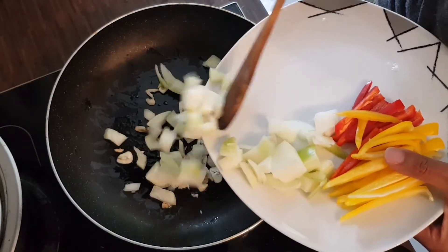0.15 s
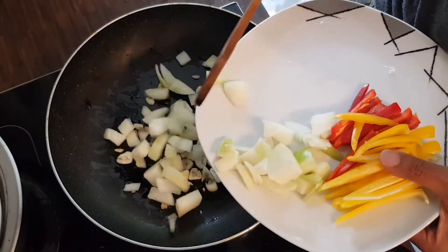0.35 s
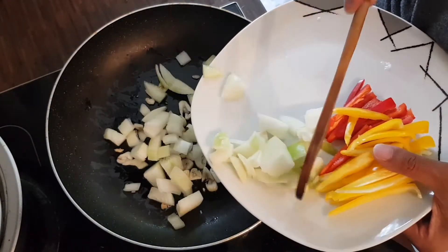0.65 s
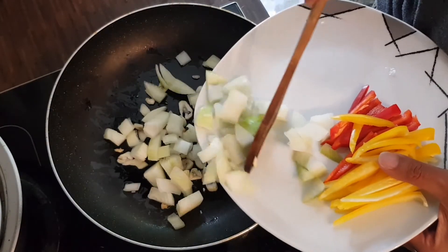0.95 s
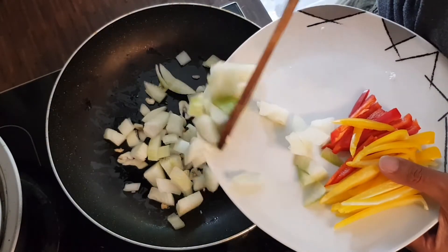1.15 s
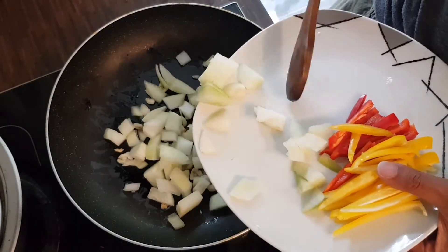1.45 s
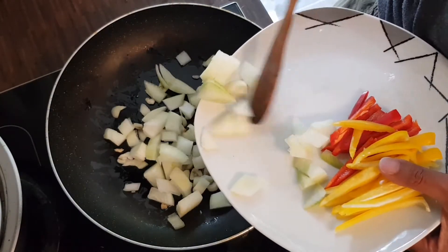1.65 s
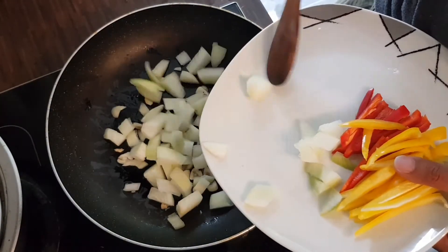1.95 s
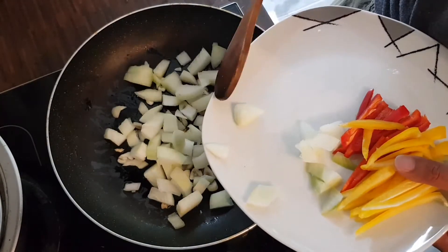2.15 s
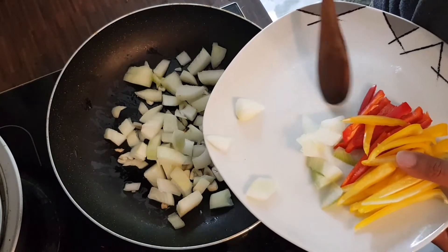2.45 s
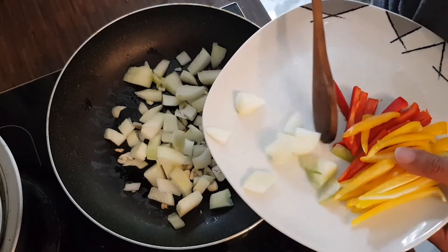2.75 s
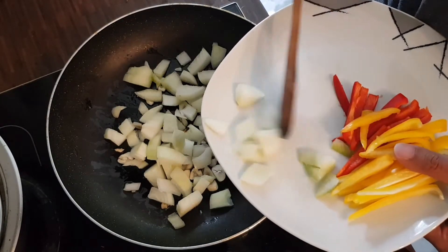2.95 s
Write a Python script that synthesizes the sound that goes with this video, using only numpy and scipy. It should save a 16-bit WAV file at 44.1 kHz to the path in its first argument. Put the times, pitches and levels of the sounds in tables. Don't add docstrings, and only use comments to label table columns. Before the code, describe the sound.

Wooden spatula knocks on a ceramic plate at about 0.7, 1.5, 2.0 and 2.3 s: ringing, full and bright, drier, then dull. Oil sizzles throughout, slightly left, swelling by 0.4 s, with sharp spits and snaps densest around 2.0-2.3 s. Soft onion heaps rub and thud into the pan near 0.2, 1.2 and 1.9 s; coarser splashes follow from 2.15 to 2.65 s. Low extractor rumble, small kitchen, close stereo microphone.

```python
import sys
import numpy as np
from scipy import signal
from scipy.fft import rfft, irfft, next_fast_len
from scipy.io import wavfile
from scipy.ndimage import uniform_filter1d, map_coordinates

SR = 44100
rng = np.random.default_rng(int(sys.argv[2]) if len(sys.argv) > 2 else 0)


def bounce(signal):
    frames = np.transpose(np.atleast_2d(signal))
    limited = np.clip(frames, -1, 1)
    pcm = np.round(limited * 32767).astype(np.int16)
    wavfile.write(sys.argv[1], SR, pcm)


def boost_factor(decibels):
    exponent = np.asarray(decibels, float) / 20
    return 10 ** exponent


N = 136710

OIL_PAN = np.array([[10 ** (1.4 / 20)], [10 ** (-1.4 / 20)]])


def unit(x):
    return x / np.sqrt(np.mean(x ** 2) + 1e-20)


def along(points, hz):
    f, v = np.transpose(points)
    return np.interp(np.log(hz + 1), np.log(f + 1), v)


def wobble(rate_hz):
    knots = rng.standard_normal(int(N * rate_hz / SR) + 4)
    return map_coordinates(knots, [np.arange(N) * rate_hz / SR])


def filtered(x, response):
    size = next_fast_len(x.shape[-1] + 8192)
    spectrum = rfft(x, size) * response(np.fft.rfftfreq(size, 1 / SR))
    return irfft(spectrum, size)[..., :x.shape[-1]]


def octave_band(hz, octaves):
    return lambda f: np.exp(-.5 * (np.log2((f + 1) / hz) / octaves) ** 2)


def paired(pair, spectrum, alike):
    def mid_side(hz):
        turn = np.arccos(np.clip(along(alike, hz), -1, 1)) / 2
        return boost_factor(along(spectrum, hz)) * [np.cos(turn), np.sin(turn)]
    mid, side = filtered(pair, mid_side)
    return unit(np.array([mid + side, mid - side]))


def port_lead(points):
    return lambda f: np.exp(.5j * along(points, f) * np.array([[1], [-1]]))


def patchy(depth_db):
    z = signal.stft(rng.standard_normal((2, N)), nperseg=256)[2]
    field = uniform_filter1d(rng.standard_normal(z.shape[1:]), 12, 0)
    field = unit(uniform_filter1d(field, 8, 1))
    return signal.istft(z * boost_factor(depth_db * field), nperseg=256)[1][:, :N]


def ring(modes, t, attack_s, scatter_db, grip_db=0):
    late = np.clip(t / .015 - 1, 0, 1) * (grip_db > 0)

    def shake(steps):
        return late * np.interp(t * 100, np.arange(101), steps)

    out = 0
    for hz, db, t60_s in modes:
        level_db = db + scatter_db * rng.normal() + grip_db * shake(rng.standard_normal(101))
        stray_rad = 1.7 * shake(np.cumsum(rng.standard_normal(101)))
        out = out + boost_factor(level_db - 60 * t / t60_s) * np.sin(2 * np.pi * hz * t + stray_rad)
    return out * (1 - np.exp(-t / attack_s))


def add(track, s, x):
    start = round(s * SR)
    track[..., start:start + x.shape[-1]] += x


def crackle(hz):
    spread_db, cap_db, t60_s = 0.5, 14, .005
    pops = rng.random((1300, 2))
    pop_db = np.minimum(-spread_db * np.log(pops[:, 1]), cap_db)
    puffs = np.bincount((pops[:, 0] * N).astype(int), boost_factor(pop_db), N)
    puffs = signal.fftconvolve(puffs, boost_factor(-60 * np.arange(600) / SR / t60_s))[:N]
    size_gain = np.sqrt(9000 / hz) ** .3
    return filtered(puffs * rng.standard_normal((2, N)),
                    lambda f: np.exp(-np.log2((f + 1) / hz) ** 2 / .6) * size_gain)


def sizzle():
    # start_s, level_db, wetness_db
    boil = [(0, -47, -5), (.17, -45.5, 3.5), (.38, -41, -1), (.9, -44, -0.5), (1.3, -40.5, -0.5),
            (1.8, -41.5, -1), (2.18, -40, 1.5), (3.1, -40, -2)]
    # freq_hz, level_db (per Hz)
    fizz_spectrum = [(500, -56), (1200, -5), (1950, -11.5), (2600, -6), (4500, -2.5), (8000, -2),
                     (11500, 0.5), (15800, -1)]
    # freq_hz, likeness (0..1)
    fizz_alike = [(1000, 0.057), (3000, 0.022), (8000, 0.017), (15000, 0.028)]
    bubble_hz = [3200, 6500, 12500]
    crackle_db, coarse_hz, fizz_db = -6.5, 5000, 4
    s, db, wet_db = np.transpose(boil)
    t = np.arange(N) / SR
    strength_db = np.interp(t, s, db) + .6 * wobble(14) + 1.2 * wobble(50)
    bubbles = unit(sum(crackle(hz) for hz in bubble_hz))
    bed = unit(patchy(depth_db=1.4)) + boost_factor(crackle_db) * bubbles
    fizz = paired(bed, fizz_spectrum, fizz_alike)
    coarse = filtered(fizz, lambda f: 1 / (1 + (f / coarse_hz) ** 4))
    wet_fizz = fizz + (boost_factor(np.interp(t, s, wet_db)) - 1) * coarse
    return wet_fizz * boost_factor(strength_db + fizz_db) * OIL_PAN


def extractor():
    # start_s, level_db
    rumble_level = [(0, -52.5), (.45, -53), (.8, -59.5), (1.1, -56), (1.5, -56), (1.801, -48.5), (2.2, -56),
                    (2.451, -53.5), (2.6, -71.5), (2.75, -54), (3.1, -56.5)]
    # freq_hz, level_db (per Hz)
    air_spectrum = [(100, -40), (200, -20), (420, -14), (612, -5), (880, -10), (1300, -19.5), (2500, -0.5),
                    (4000, -33)]
    low_spectrum = [(32, -8), (58, -5.5), (95, -1.0), (130, -13.5), (180, -23.5), (600, -19.5), (1300, -20)]
    alike = [(40, 0.98), (130, 1.0), (400, 0.69), (1400, 0.015)]
    motor_hz, motor_db, rumble_db, air_db = 97.5, -4.5, 1.5, -58
    s, db = np.transpose(rumble_level)
    low = paired(patchy(depth_db=-3.3), low_spectrum, alike)
    motor_phase = 2 * np.pi * np.cumsum(motor_hz + 8 * wobble(8.1)) / SR
    low = low + boost_factor(motor_db + 1.54 * wobble(10)) * np.sin(motor_phase)
    air = paired(patchy(depth_db=0.3), air_spectrum, alike)
    level_db = np.interp(np.arange(N) / SR, s, db) + rumble_db + 0.4 * wobble(3.6)
    return boost_factor(level_db) * low + boost_factor(air_db) * air


def snaps():
    # start_s, peak_db, centre_hz
    bursts = [(.0997, -40, 11000), (0.19, -17.5, 11000), (.3545, -18, 11000), (.7293, -23, 4800),
              (.8335, -23, 10900), (.9313, -28, 11100), (1.0964, -18, 10800), (1.4614, -17, 14300),
              (1.7843, -37, 8340), (1.8407, -26, 14000), (1.9624, -20, 10400), (2.0414, -15.5, 11600),
              (2.0435, -22, 5500), (2.1315, -20, 10500), (2.1715, -18, 10000), (2.1783, -22, 5500),
              (2.197, -21, 10000), (2.2428, -19, 12500), (2.2945, -27, 9050)]
    octaves, gain_db, t60_s, attack_s = 0.86, -5.5, .008, 0.00018
    out, t = np.zeros((2, N + SR)), np.arange(SR // 20) / SR
    for s, db, hz in bursts:
        noise = unit(filtered(rng.standard_normal((2, len(t))), octave_band(hz, octaves)))
        add(out, s, boost_factor(db + gain_db - 60 * t / t60_s) * np.clip(t / attack_s, 0, 1) * noise)
    return out[:, :N] * OIL_PAN


def slides():
    # start_s, length_s, level_db
    heaps = [
        (0.127, 0.27, -48),
        (1.111, 0.35, -52.5),
        (1.57, 0.42, -60),
        (1.859, 0.12, -43.5),
        (1.953, 0.31, -57),
    ]
    # freq_hz, level_db (per Hz)
    rub_spectrum = [(40, -7), (70, 3.5), (130, -4.5), (200, -9.5), (450, -14), (800, -18), (1600, -45)]
    attack_s, fade_s = 0.011, 0.03
    t = np.arange(N) / SR
    push = np.zeros(N)
    for s, length_s, db in heaps:
        fade = np.exp(-np.maximum(t - s - length_s, 0) / fade_s)
        push += boost_factor(db) * np.clip((t - s) / attack_s, 0, 1) * fade
    rub = paired(rng.standard_normal((2, N)), rub_spectrum, [(50, 0.24), (150, .7), (600, 0.68)])
    return push * boost_factor(0.5 * wobble(24.86)) * rub


def onion():
    # start_s, boom_db, wet_slap_db, firm_tap_db
    landings = [(0.127, -51, -43.5, -37), (.187, -25, -50, -46), (0.2812, -24, -33, -29),
                (0.313, -40, -43, -66), (0.371, -37.5, -57, -57), (1.137, -42.5, -64, -72),
                (1.183, -48, -66, -93), (1.254, -33, -52, -67), (1.333, -51, -43, -46),
                (1.39, -41, -62, -70), (1.52, -48, -47.5, -52), (1.642, -61, -51.5, -66),
                (1.867, -30, -34.5, -46), (1.885, -32.5, -33, -43), (1.901, -27, -39, -62),
                (1.929, -46, -43, -64), (2, -27.5, -55, -70), (2.07, -51, -65, -65), (2.147, -51, -59, -76)]
    # freq_hz, level_db, t60_s
    boom_modes = [(58.74, -16.5, 0.89), (91.4, -6, 0.24), (119.2, -0.5, 0.17), (239.6, -17.5, 0.092)]
    # freq_hz, level_db, t60_s
    tap_modes = [(396, -3, 0.086), (601, -6, 0.07), (904, -10, 0.052), (1200, -1, 0.027),
                 (1490, -12, 0.041)]
    wet_spectrum = [(130, -30), (300, 0), (700, -5), (1300, -24), (2500, -60)]
    roll_spectrum = [(30, -33), (57, 30), (130, -39), (220, -42.0), (500, -10.5), (1300, -12), (3000, -62)]
    tumble_db, tumble_t60_s = -18, .4
    out, t = np.zeros((2, N + 2 * SR)), np.arange(SR // 2) / SR
    for s, boom_db, slap_db, tap_db in landings:
        boom = ring(boom_modes, t, 0.0081, scatter_db=4.0)
        add(out, s, boost_factor(boom_db) * boom * boost_factor([[1.2], [-.7]]))
        add(out, s, boost_factor(tap_db) * ring(tap_modes, t, .0006, scatter_db=4.0))
        wet = paired(rng.standard_normal((2, len(t))), wet_spectrum, [(500, .7)])
        add(out, s, boost_factor(slap_db - 6 - 60 * t / 0.28) * np.clip(t / 0.0051, 0, 1) * wet)
        tumble = paired(rng.standard_normal((2, len(t))), roll_spectrum, [(50, 0.48), (500, 0.31)])
        tumble_level = boost_factor(boom_db + tumble_db - 60 * t / tumble_t60_s)
        add(out, s, tumble_level * np.clip(t / 0.0031, 0, 1) * tumble)
    return out[:, :N]


def spits():
    # start_s, peak_db, centre_hz, t60_s
    fine = [(0.1895, -22, 10100, 0.056), (0.355, -20.5, 11600, 0.033), (0.3882, -26, 11900, 0.18),
            (0.4643, -31, 11100, 0.035), (0.519, -24.5, 10500, 0.04), (0.624, -27, 10000, 0.034),
            (1.041, -25, 13250, 0.036), (1.049, -23, 11200, 0.034), (1.0945, -18.5, 11200, 0.061),
            (1.166, -23, 11100, 0.039), (1.4872, -15.5, 11000, 0.037), (1.5934, -22, 14800, 0.021),
            (1.6847, -16, 10300, 0.017), (1.8698, -24, 7700, 0.11), (2.0065, -19.5, 9600, 0.034),
            (2.0376, -19, 12700, 0.032), (2.131, -13.5, 11000, 0.03), (2.167, -13, 13000, 0.013),
            (2.2426, -14.5, 14500, 0.016), (2.2932, -14.5, 11500, 0.025), (2.508, -20, 7460, 0.039),
            (2.779, -26, 13200, 0.03), (2.9214, -25, 12000, 0.053), (2.961, -18.5, 11600, 0.027)]
    # start_s, peak_db, centre_hz, t60_s
    splashes = [(2.152, -23.5, 5270, 0.079), (2.178, -25, 4930, 0.075), (2.29, -21.5, 5000, 0.077),
                (2.566, -22.5, 3230, 0.025), (2.584, -23.5, 3720, 0.06), (2.645, -21, 3900, 0.045)]
    octaves, gain_db, tail_db, tail_stretch = 0.72, -9.5, -12.5, 7
    out, t = np.zeros((2, N + SR)), np.arange(SR // 5) / SR
    for s, db, hz, t60_s in fine + splashes:
        bell = octave_band(hz, octaves)
        noise = unit(filtered(rng.standard_normal((2, len(t))), lambda f: bell(f) * (f < 15900)))
        steps = np.repeat(rng.standard_normal(len(t) // 20 + 1), 20)[:len(t)]
        burst = boost_factor(3.6 * steps - 60 * t / t60_s)
        flare = boost_factor(tail_db - 60 * t / t60_s / tail_stretch)
        add(out, s, boost_factor(db + gain_db) * (burst + flare) * (1 - np.exp(-t / 0.0016)) * noise)
    return out[:, :N] * OIL_PAN


def plate():
    # start_s, body_db, middle_db, upper_db, ring_db
    blows = [
        (0.7293, -22.5, -43, -54, -7.5),
        (1.4644, -19, -17, -24, -11.5),
        (1.9754, -18.5, -18, -25, -28),
        (2.3109, -18, -62, -29.5, -36),
    ]
    # scuff_db, ring_partner_db
    touches = [(-38, -22), (-38.5, -11), (-36.5, -34), (-35, -15.5)]
    # freq_hz, level_db, t60_s
    body_modes = [(610, -21, .26), (630, -2, .05), (765, -8, .06), (480, -11, .035), (1040, -5, .06),
                  (1130, 1, .035), (925, -10, .05), (1300, -8, .035), (1460, -4, .04)]
    middle_modes = [(1558, -15, .2), (1556, -1, .075), (1525, -6, .035), (1830, -7, .045)]
    upper_modes = [(2045, -2, .05), (2210, -9, .2), (2370, -3, .04), (2770, -2, .07), (2980, -6, .07),
                   (3200, -7, .04), (3750, -8, .05)]
    ring_modes = [(2597, 0, .052), (2610, -32, .36)]
    twin_modes = [(2500, 0, .05), (2545, -19, .28)]
    # freq_hz, level_db
    crack_spectrum = [(250, -50), (600, -1), (1400, 0), (2200, -7), (3500, -15), (6000, -27), (8500, -60)]
    crack_db, crack_t60_s = 5, 0.0017
    rattle_db, rattle_t60_s = -1, .05
    scuff_s, scuff_t60_s = .022, 0.38
    opposed_twin = -np.array(twin_modes) * [1, -1, -1]
    out, t = np.zeros(N + SR), np.arange(SR // 3) / SR
    for (s, body_db, mid_db, up_db, ring_db), (scuff_db, twin_db) in zip(blows, touches):
        for db, modes in (body_db, body_modes), (mid_db, middle_modes), (up_db, upper_modes):
            add(out, s, boost_factor(db) * ring(modes, t, .0002, scatter_db=1.5, grip_db=4))
        for db, modes in (ring_db, ring_modes), (twin_db, opposed_twin):
            add(out, s, boost_factor(db) * ring(modes, t, .0007, scatter_db=.5, grip_db=4))
        wood = unit(filtered(rng.standard_normal(len(t)), lambda f: boost_factor(along(crack_spectrum, f))))
        dying = boost_factor(crack_db - 60 * t / crack_t60_s) + boost_factor(rattle_db - 60 * t / rattle_t60_s)
        add(out, s, boost_factor(body_db) * dying * np.clip(t / 0.00028, 0, 1) * wood)
        scuff = np.clip(t / 0.01, 0, 1) * boost_factor(-60 * np.maximum(t - scuff_s, 0) / scuff_t60_s)
        add(out, s - scuff_s, boost_factor(scuff_db) * wood[::-1] * scuff)
    return filtered(out[:N], lambda f: (1j * f / (260 + 1j * f)) ** 4)


def kitchen(x):
    # freq_hz, t60_s
    decay = [(200, 0.73), (2000, 0.7), (10000, 0.35)]
    # freq_hz, level_db
    colour = [(700, 0), (1500, -3), (2600, -9)]
    coloured = filtered(x, lambda f: boost_factor(along(colour, f)))
    hz, t, z = signal.stft(rng.standard_normal((2, SR // 2)), SR, nperseg=256)
    tail = signal.istft(z * boost_factor(-60 * t / along(decay, hz)[:, None]), SR, nperseg=256)[1]
    tail = tail / np.linalg.norm(tail[0])
    delayed = np.pad(coloured, (150, 0))
    return signal.fftconvolve(delayed[None], tail, axes=1)[:, :N]


def scene():
    # freq_hz, lead_rad
    plate_lead = [(600, .8), (1100, 1.3), (1550, 1.5), (2600, 1.15)]
    # freq_hz, lead_rad
    pan_lead = [(50, 1.0), (130, .6), (500, .4)]
    room_db = -12
    knocks, food = plate(), onion()
    direct = filtered(np.array([knocks, knocks]), port_lead(plate_lead)) * boost_factor([[.6], [-.6]])
    direct = direct + filtered(food, port_lead(pan_lead))
    room = boost_factor(room_db) * kitchen(knocks + food.mean(0))
    return direct + room + sizzle() + extractor() + snaps() + slides() + spits()


def top_cut(x):
    return signal.sosfilt(signal.butter(12, 16300, fs=SR, output="sos"), x)


def record(dry):
    mix = filtered(dry, lambda f: f < 15950)
    return top_cut(mix)


dry = scene()
out = record(dry)
bounce(out)
```